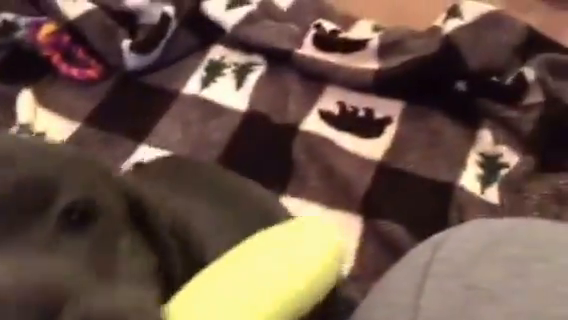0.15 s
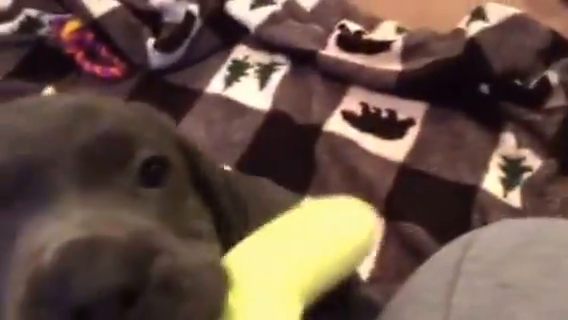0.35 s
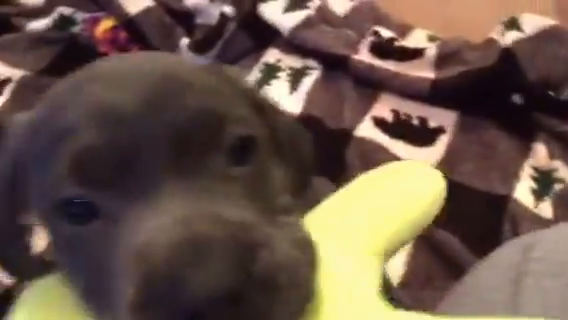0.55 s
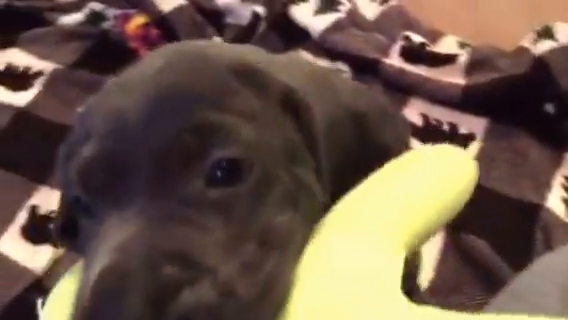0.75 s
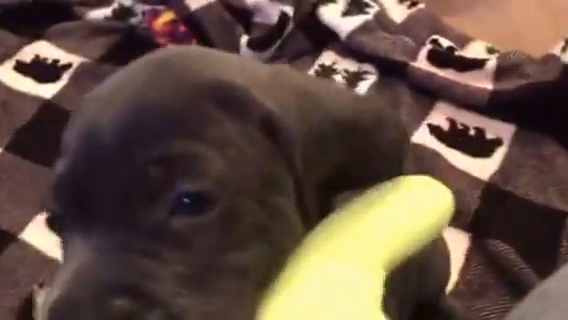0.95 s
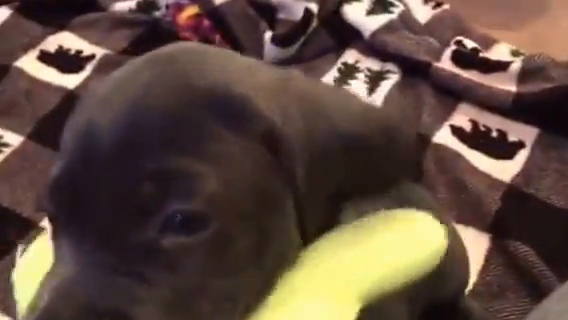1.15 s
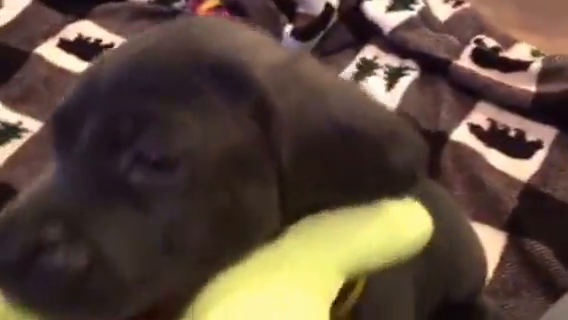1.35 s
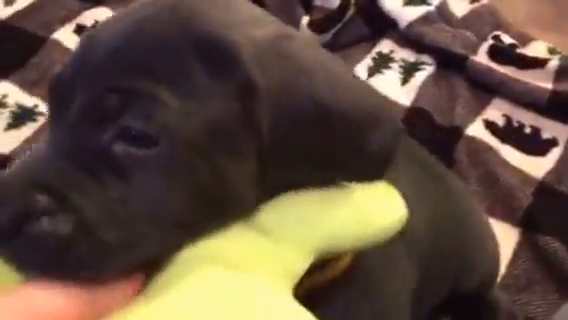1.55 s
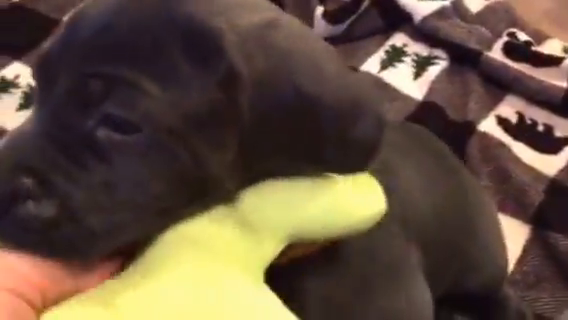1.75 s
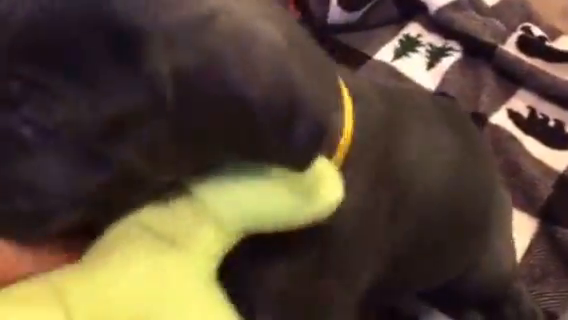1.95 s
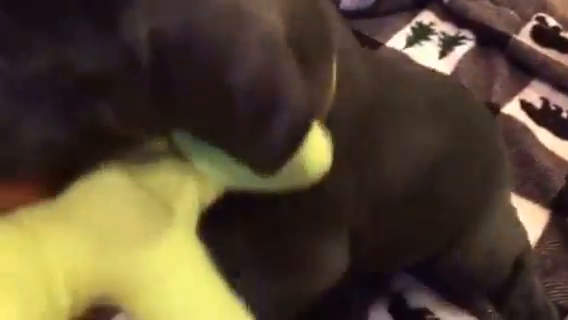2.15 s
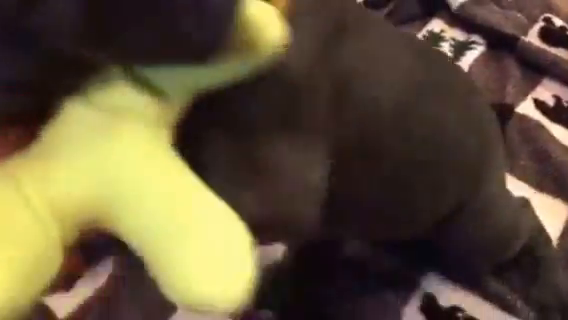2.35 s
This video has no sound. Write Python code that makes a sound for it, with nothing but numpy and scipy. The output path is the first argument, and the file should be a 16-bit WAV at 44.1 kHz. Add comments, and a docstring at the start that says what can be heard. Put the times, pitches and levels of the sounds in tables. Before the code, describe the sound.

A squeaky plush dog toy is squeezed seven times in quick succession, close to the microphone in a quiet room. Each squeeze gives a short, bright squeak, then a higher one on release, with faint fabric rubbing underneath.

```python
"""In a quiet room, a plush dog toy is handled close by; its fabric rubs and bumps softly.
A squeeze pushes air out through a low, bright reed; the bulb then refills through a higher, purer one.
In each squeak, pitch and loudness arch with the air flow, then drop as the reed stalls with a rasp.
The pair sounds seven times in about two seconds; before some refills the bulb ticks as it springs back."""
import sys
import numpy as np
from scipy import signal
from scipy.fft import rfft, irfft, next_fast_len
from scipy.io import wavfile
from scipy.ndimage import map_coordinates

SR = 44100
rng = np.random.default_rng(int(sys.argv[2]) if len(sys.argv) > 2 else 0)


def materialize(psi):
    """Save the field psi as 16-bit PCM at rate SR to the path in sys.argv[1].

    A 1-D psi becomes a single channel; in a 2-D psi each row is a channel.
    """
    bounded = np.clip(np.atleast_2d(psi).T, -1, 1)
    quanta = np.round(bounded * 32767).astype(np.int16)
    wavfile.write(sys.argv[1], SR, quanta)


N = 110250


def amp(db):
    return 10 ** (np.asarray(db) / 20)


def along(points, hz):
    """Interpolate (freq_hz, value) points on a log frequency axis."""
    freqs, values = np.transpose(points)
    return np.interp(np.log(hz + 1), np.log(freqs + 1), values)


def wobble(t, rate):
    """Smooth random curve, rate knots per second."""
    return map_coordinates(rng.standard_normal(256), [t * rate], mode="wrap")


def filtered(x, response):
    """Zero-phase filter with gain response(hz)."""
    n = x.shape[-1]
    padded = next_fast_len(n + SR // 10)
    gain = response(np.fft.rfftfreq(padded, 1 / SR))
    return irfft(rfft(x, padded) * gain, padded)[..., :n]


def noise(spectrum, size):
    """Coloured noise, rms 1."""
    x = filtered(rng.standard_normal(size), lambda hz: amp(along(spectrum, hz)))
    return x / np.sqrt(np.mean(x ** 2) + 1e-20)


def add(out, start_s, x):
    i = round(start_s * SR)
    out[i:i + len(x)] += x[:len(out) - i]


# Background spectrum: freq_hz, gain_db
FLOOR_SPECTRUM = [(20, -17.5), (65, 1.5), (120, -7), (230, -9.5), (360, -10), (550, -18), (1500, -19.5),
                  (4000, -22), (9000, -24), (12000, -38.5), (16000, -49)]

def noise_floor(level_db=-67.5):
    """Steady low rumble and faint hiss."""
    return amp(level_db) * noise(FLOOR_SPECTRUM, N)


# Reverb decay: freq_hz, t60_s
ROOM_DECAY = [(200, .4), (1500, 0.43), (4000, 0.47), (9000, 0.43), (15000, 0.076)]
# Reverb spectrum at onset: freq_hz, gain_db
ROOM_SPECTRUM = [(200, 18), (1500, -1.5), (4000, -2.5), (9000, -2), (15000, -3.5)]

def room_reverb(x, level_db=-24.5, build_s=0.017):
    """Faint diffuse tail; the top treble dies first."""
    hz, t, bins = signal.stft(rng.standard_normal(SR * 3 // 4), SR, nperseg=256)
    gain_db = along(ROOM_SPECTRUM, hz)[:, None] - 60 * t / along(ROOM_DECAY, hz)[:, None]
    _, tail = signal.istft(bins * amp(gain_db), SR, nperseg=256)
    tail *= 1 - np.exp(-np.arange(len(tail)) / SR / build_s)
    return amp(level_db) * signal.fftconvolve(x, tail / np.linalg.norm(tail))[:N]


# Fabric contacts: centre_s, half_length_s, level_db
FABRIC_RUBS = [(.01, 0.028, -52.5), (0.384, 0.0083, -51), (0.672, 0.024, -56), (1.03, 0.018, -49.5),
               (1.1, 0.065, -57.5), (1.399, 0.021, -64), (1.581, 0.034, -54.5), (1.673, 0.042, -63.5),
               (1.919, 0.023, -68.5)]
# Fabric spectrum: freq_hz, gain_db
FABRIC_SPECTRUM = [(30, -9), (70, -5), (130, 7.5), (210, 3), (350, -10), (700, -26.5), (2000, -40.5),
                   (8000, -56.5)]

def fabric_rubs():
    """The handled plush rubs and bumps: dull swells of noise."""
    t = np.arange(N) / SR
    envelope = sum(amp(level_db) * np.exp(-((t - centre_s) / half_length_s) ** 2)
                   for centre_s, half_length_s, level_db in FABRIC_RUBS)
    return envelope * noise(FABRIC_SPECTRUM, N)


# Bulb ticks: start_s, level_db
BULB_TICKS = [(.335, -55), (0.936, -58), (1.594, -58), (2.173, -56.5)]
# Air rush through the reed, also the tick spectrum: freq_hz, gain_db
AIR_SPECTRUM = [(100, -22.5), (600, -33), (1100, -6.5), (2600, 2.5), (5500, -6), (9000, 2), (12000, -6.5),
                (16000, -20)]

def bulb_ticks(decay_s=0.0012):
    """The plastic bulb springs back: short, bright noise bursts."""
    out = np.zeros(N)
    t = np.arange(SR // 20) / SR
    for start_s, level_db in BULB_TICKS:
        add(out, start_s, amp(level_db) * np.exp(-t / decay_s) * noise(AIR_SPECTRUM, len(t)))
    return out


# Rattle spectrum: freq_hz, gain_db
RASP_SPECTRUM = [(60, -12.5), (250, -7), (600, -13.5), (1100, -6.5), (2600, 4), (5500, -5), (9000, -1),
                 (12000, -1.5), (16000, -19)]

def closing_rasp(t, close_s, lead_s=0.0018, half_length_s=0.0064):
    """The reed rattles as it closes, peaking just before the stall."""
    envelope = np.exp(-((t - close_s + lead_s) / half_length_s) ** 2)
    return envelope * noise(RASP_SPECTRUM, len(t))


ATTACK_S, TUBE_CUTOFF_HZ = 0.00056, 920
JITTER, STALL_JITTER, PRESSURE_WAVER = 0.003, 0.03, 0.0045  # fractions of pitch
FLUTTER_RATE_HZ, FLUTTER_BAND_HZ, FLUTTER_WIDTH_HZ = 310, 8900, 900
FLUTTER_BAND_RAD, FLUTTER_TREBLE_RAD = 1.7, 0.68
EDGE_HZ, EDGE_WIDTH_HZ = 12000, 2800  # band shifted by edge_db as the flow sags

def reed_squeak(stroke, spectrum, start_hz, swell_db_per_hz, treble_db_per_hz, stall_drop,
                uneven_db, edge_db, hiss_db):
    """One stroke of the bulb: the reed speaks at once, rises with the flow, sags and stalls."""
    (length_s, crest_s, stall_s, top_hz, close_hz,
     level_db, push_db, body_db, treble_db, flutter, rasp_db) = stroke
    t = np.arange(SR // 10) / SR
    rise = np.sin(np.pi / 2 * np.clip(t / crest_s, 0, 1))
    sag = np.clip((t - crest_s) / max(length_s - crest_s, 1e-3), 0, 1) ** 1.6
    late_s = np.logaddexp(0, (t - length_s) / 0.00094) * 0.00096  # soft ramp from the stroke's end
    stall = np.tanh(late_s / 0.005)
    gate = (1 - np.exp(-t / ATTACK_S)) * np.exp(-late_s / stall_s)

    blown_hz = start_hz + (top_hz - start_hz) * rise + (close_hz - top_hz) * sag
    jitter = (JITTER + STALL_JITTER * stall) * wobble(t, rate=900)
    waver = PRESSURE_WAVER * wobble(t, rate=130)
    pitch_hz = blown_hz * (1 - stall_drop * stall) * (1 + jitter + waver)
    phase = 2 * np.pi * np.cumsum(pitch_hz) / SR
    # A second reed mode splits the high overtones near full flow.
    flutter_phase = 2 * np.pi * FLUTTER_RATE_HZ * t + wobble(t, rate=120)
    flutter_amount = flutter * (rise * (1 - sag)) ** 4

    reed = np.zeros(len(t))
    for k in range(1, 15):
        hz = k * pitch_hz
        high = np.clip(hz / 8000, 0, 1)
        gain_db = along(spectrum, hz) + body_db * (k in (2, 3))
        gain_db += (blown_hz - top_hz) * (swell_db_per_hz * (1 - high) + treble_db_per_hz * high)
        gain_db += high * (treble_db + uneven_db * wobble(t, rate=45))
        gain_db += edge_db * sag * np.exp(-((hz - EDGE_HZ) / EDGE_WIDTH_HZ) ** 2)
        flutter_band = np.exp(-((hz - FLUTTER_BAND_HZ) / FLUTTER_WIDTH_HZ) ** 2)
        depth_rad = FLUTTER_BAND_RAD * flutter_band + FLUTTER_TREBLE_RAD * high ** 4
        split_rad = flutter_amount * depth_rad * np.sin(flutter_phase + rng.uniform(0, 2 * np.pi))
        harmonic = np.sqrt(2) * np.sin(k * phase + split_rad + rng.uniform(0, np.pi))
        reed += amp(gain_db) * (hz < SR / 2) * harmonic

    hiss = amp(hiss_db) * noise(AIR_SPECTRUM, len(t))
    tube = signal.butter(4, TUBE_CUTOFF_HZ, "highpass", fs=SR, output="sos")  # too small to radiate bass
    voice = signal.sosfilt(tube, gate * (reed + hiss))
    rasp = amp(rasp_db) * closing_rasp(t, length_s)
    return amp(level_db + push_db * (1 - rise)) * (voice + rasp)


# Air pushed out: start_s, length_s, crest_s, stall_s, top_hz, close_hz,
# level_db, push_db, body_db, treble_db, flutter (0-1), rasp_db
SQUEEZE_STROKES = [(0.219, .047, .029, 0.0042, 1284, 1261, -17.5, 3.5, 2.5, -3, 0.8, -20),
                   (0.5072, 0.041, 0.03, 0.0045, 1467, 1432, -12.5, 0, 1.5, -1, 0.1, -21),
                   (0.8109, 0.056, 0.024, 0.0023, 1189, 1125, -20.5, 1.5, 0.5, -0.5, 0.54, -23.5),
                   (1.146, 0.06, 0.029, 0.0015, 1220, 1155, -19, 0, 0.5, -1.5, 0.5, -25),
                   (1.4833, 0.044, 0.017, 0.0019, 1174, 1153, -20, -1.5, -0.5, 0.5, .05, -27),
                   (1.7626, .049, 0.031, 0.0019, 1246, 1130, -19.5, 0, -1.5, 1.5, 0.2, -24.5),
                   (2.0418, 0.051, 0.031, 0.0023, 1248, 1150, -20.5, 0.5, -1, 2.5, 0.2, -26.5)]
# Air drawn in: same columns
REFILL_STROKES = [(0.3506, .047, 0.037, 0.0039, 1764, 1680, -11.5, 1, 0.27, -1.5, .05, -19),
                  (0.6278, 0.05, .041, 0.0032, 1729, 1712, -12.5, -0.3, -0.26, 1.5, .05, -19.5),
                  (0.959, 0.059, .030, .002, 1607, 1480, -17.5, 0.41, 2, 1, 0, -38),
                  (1.2809, 0.062, .025, 0.0018, 1609, 1443, -18.5, -0.77, 2.2, 1.5, 0, -33),
                  (1.623, 0.05, 0.031, 0.0023, 1636, 1490, -17, 0.99, 0.039, 3, 0.019, -31),
                  (1.8910, 0.062, 0.027, 0.0022, 1593, 1469, -17.5, -0.8, -2, 0, 0.0059, -35),
                  (2.1992, 0.059, 0.037, .002, 1602, 1437, -18, -0.46, 1.35, -0.5, 0.0074, -35)]
# Harmonic envelope of each reed: freq_hz, gain_db
SQUEEZE_SPECTRUM = [(800, -17.5), (1200, -3), (2450, -3.5), (3600, -8), (4900, -14.5), (6100, -12.5),
                    (7200, -15.5), (8400, -10), (9600, -8), (10800, -22), (13000, -25.5), (14500, -33),
                    (16000, -44)]
REFILL_SPECTRUM = [(1000, -9.5), (1600, 0), (3200, -8), (4800, -15.5), (6400, -19.5), (8000, -27.5),
                   (9700, -17.5), (11200, -22), (12900, -24.5), (14500, -29.5), (16000, -40.5)]

def squeaker():
    """Two reeds take turns: one blown by the squeeze, one by the refill."""
    out = np.zeros(N)
    for start_s, *stroke in SQUEEZE_STROKES:
        add(out, start_s, reed_squeak(
            stroke, SQUEEZE_SPECTRUM, start_hz=1114.6, swell_db_per_hz=0.0345, treble_db_per_hz=0.0341,
            stall_drop=0.26, uneven_db=3.5, edge_db=-4.5, hiss_db=-24.5))
    for start_s, *stroke in REFILL_STROKES:
        add(out, start_s, reed_squeak(
            stroke, REFILL_SPECTRUM, start_hz=1524, swell_db_per_hz=0, treble_db_per_hz=0.0853,
            stall_drop=0.19, uneven_db=3, edge_db=10.5, hiss_db=-33))
    return out


def scene():
    toy = squeaker() + fabric_rubs() + bulb_ticks()
    mono = toy + room_reverb(toy) + noise_floor()
    return np.array([mono, mono])


TOP_HZ = 16150

def record(dry):
    """Brick-wall low-pass."""
    return filtered(dry, lambda hz: hz < TOP_HZ)


dry = scene()
out = record(dry)
materialize(out)
```